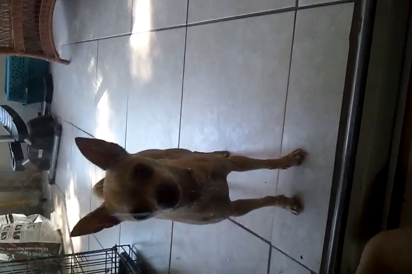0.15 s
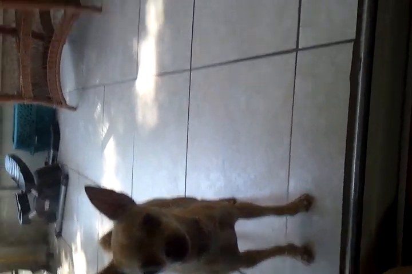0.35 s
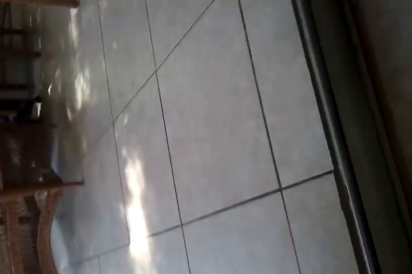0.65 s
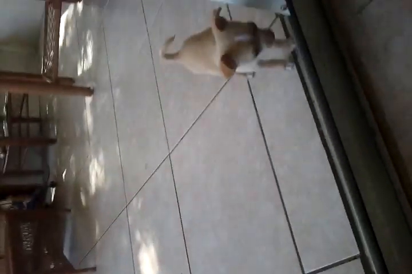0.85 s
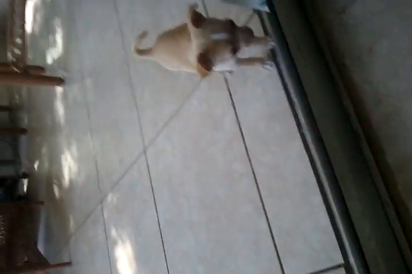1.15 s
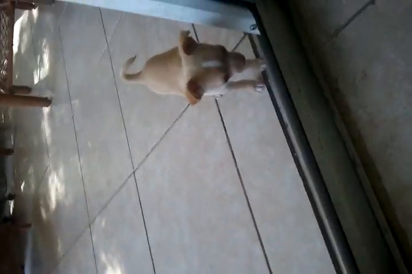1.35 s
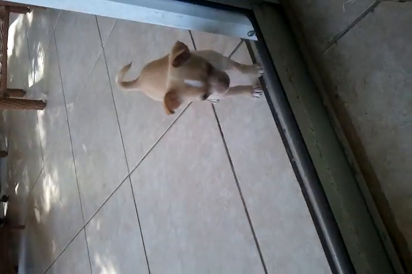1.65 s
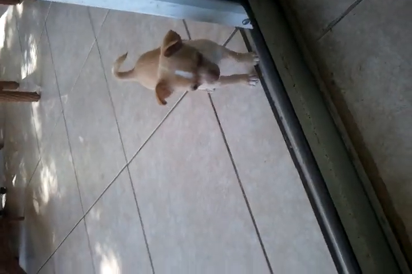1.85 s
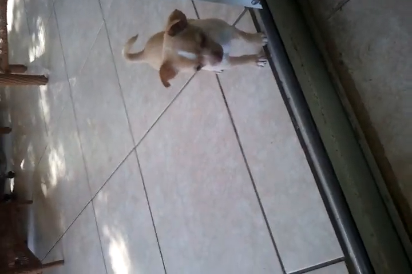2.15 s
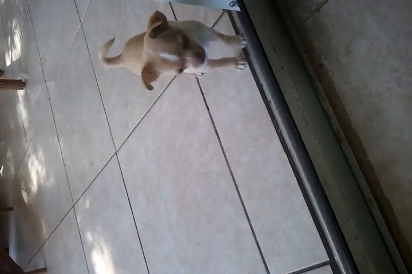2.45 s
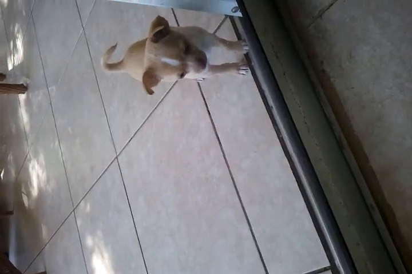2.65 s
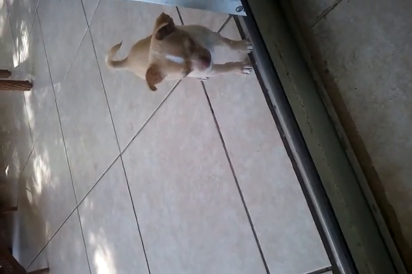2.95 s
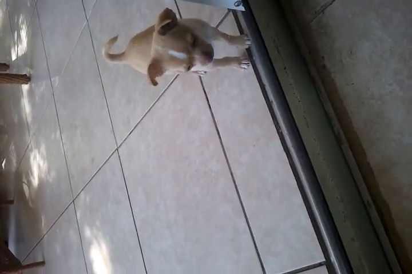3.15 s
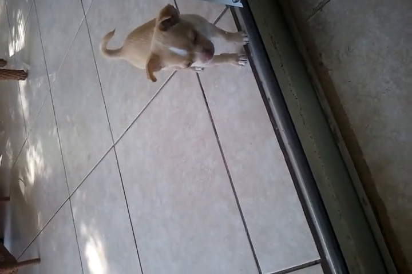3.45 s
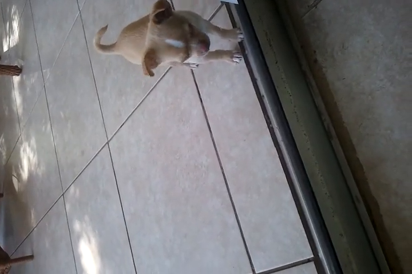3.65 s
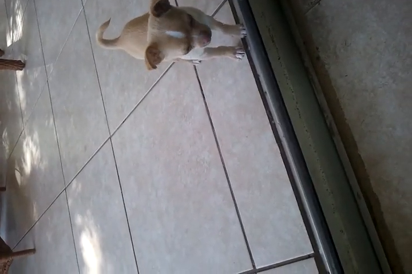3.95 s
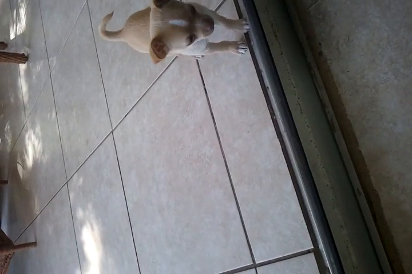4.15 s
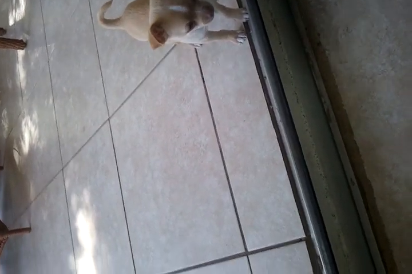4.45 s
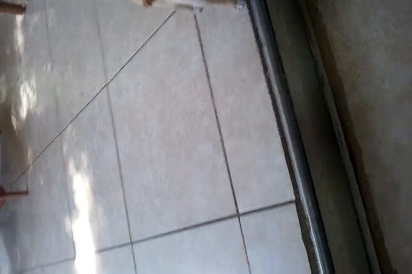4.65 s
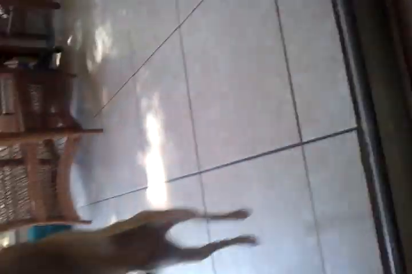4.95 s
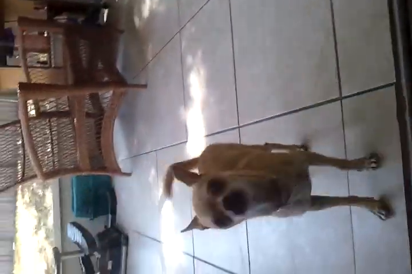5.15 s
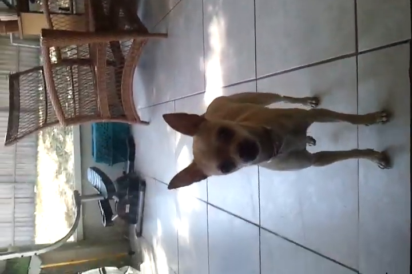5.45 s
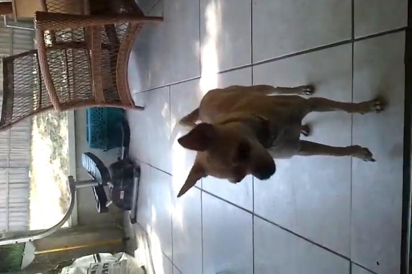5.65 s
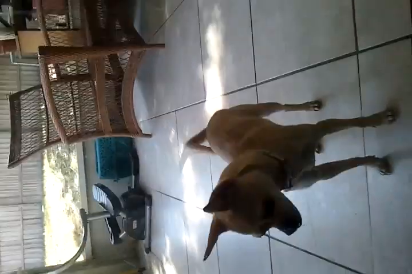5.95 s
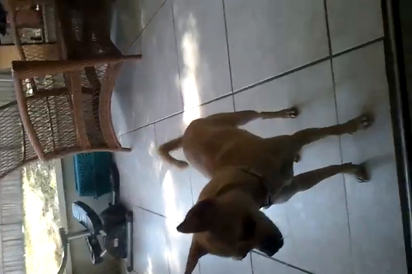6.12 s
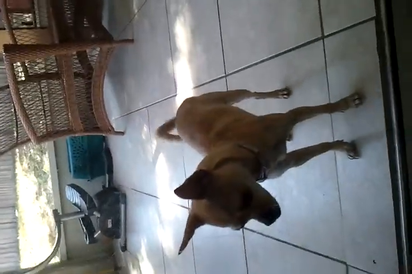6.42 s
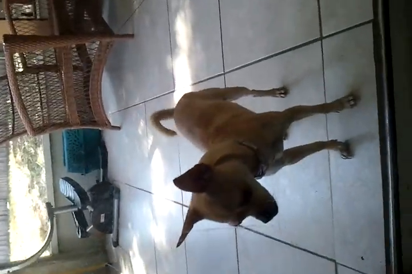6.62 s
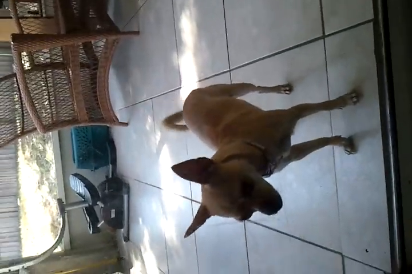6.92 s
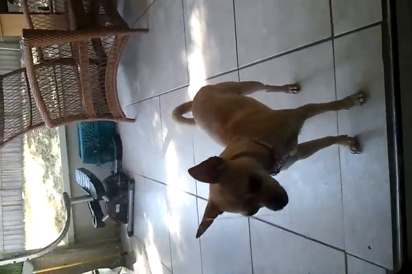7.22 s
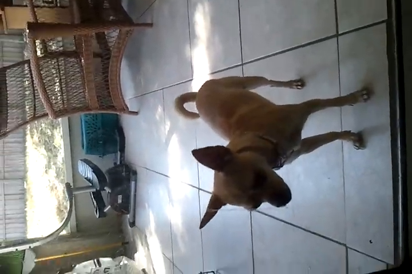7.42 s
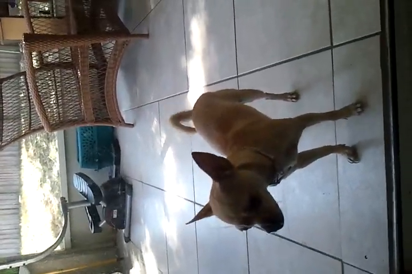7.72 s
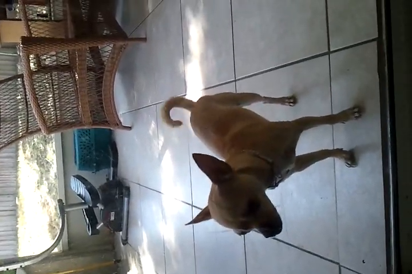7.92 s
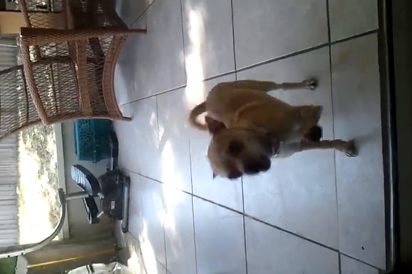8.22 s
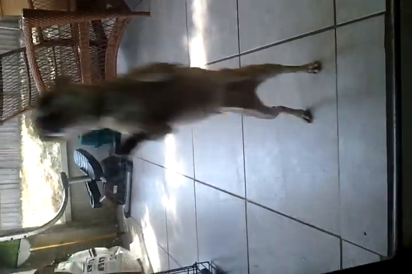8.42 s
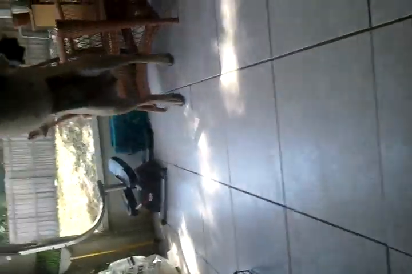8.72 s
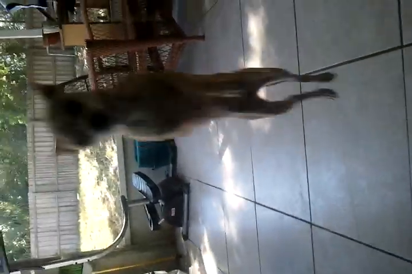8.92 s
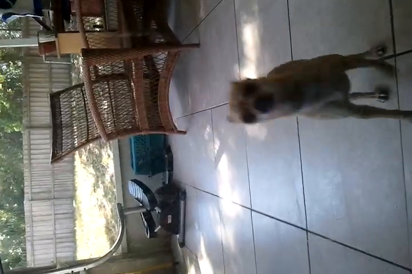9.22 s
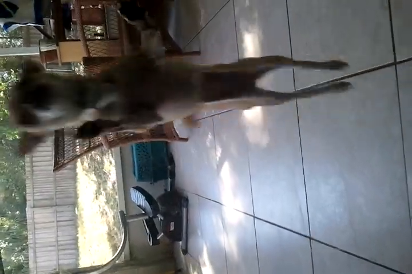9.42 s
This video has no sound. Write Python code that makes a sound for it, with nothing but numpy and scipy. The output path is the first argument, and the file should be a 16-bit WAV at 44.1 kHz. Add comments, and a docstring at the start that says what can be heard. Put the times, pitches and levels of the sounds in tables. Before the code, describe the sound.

In a hard, echoing tiled house, dishes and cutlery clink in the background over a low motor hum, then a door bangs and rebounds and the hum drops away. A small dog whines thinly, then scrabbles its claws on a glass door with deep thuds. Loud dry clicks and creaks come from the handheld microphone's case, before a dull distant knock and more claw taps.

```python
"""Small dog at a glass door

A small dog behind the door whines thinly (gliding tones with an octave partial), then jumps up and
taps the pane: claws scrape and ring the glass, paws swing it, and slide softly on the tiles.
Early on, dishes clink and a door bangs further back in the tiled house (noise bursts with ringing modes)
while a motor hums; dull knocks follow. Air and a low rumble lie beneath.
The hand-held recorder's case clicks and creaks close to the microphone."""
import sys
import numpy as np
from scipy import signal
from scipy.fft import rfft, irfft
from scipy.io import wavfile

SR = 44100
rng = np.random.default_rng(int(sys.argv[2]) if len(sys.argv) > 2 else 0)


def store_pcm(level_fs):
    """Save levels as 16-bit WAV."""
    pcm = np.round(np.clip(level_fs, -1, 1) * 32767).astype(np.int16)
    wavfile.write(sys.argv[1], SR, np.atleast_2d(pcm).T)


N = 422478
TIME = np.arange(N) / SR

# The drawn-out whine, as breakpoints: [start_s, pitch_hz, level_db]
LONG_WHINE = [(3.05, 1112, -48), (3.092, 1012, -43), (3.116, 937.8, -49), (3.128, 942, -51),
              (3.15, 873, -49.5), (3.204, 923, -39.5), (3.38, 938, -39.5), (3.402, 1040, -40),
              (3.418, 1015, -49)]
# Short whines; the octave and echo levels are relative to the fundamental and the call:
# [start_s, length_s, pitch_hz, glide_octaves, level_db, octave_db, echo_db]
SHORT_WHINES = [(4.317, .055, 2180, -0.057, -56.5, 9, -12), (4.39, 0.028, 2150, 0, -65, 15, -12),
                (4.457, 0.039, 2120, -.04, -40, -1.5, -11), (5.235, .036, 741, 0.014, -29, -23, -19),
                (6.738, .11, 746, .5, -43, -18, -15), (9.169, 0.0615, 1118, 0.0091, -34.5, -17, -5)]
WHINE_ATTACK_S, WHINE_RELEASE_S, WHINE_FLUTTER_DB = 0.018, 0.0063, 1.5
SWOOP_HZ, SWOOP_S = 110, 0.0074  # a short whine starts sharp and settles
LONG_WHINE_OCTAVE_DB, LONG_WHINE_ECHO_DB = -8.5, -11.5

# Claws on the pane: [start_s, level_db, ring_hz, tilt_db_per_octave]
CLAW_TAPS = [(4.631, -25, 3060, 2), (4.7027, -18.5, 2550, 3.5), (4.8972, -19.5, 3080, 2),
             (4.946, -23.5, 2960, 2.5), (4.954, -22, 2700, 0), (4.997, -30.5, 2860, 2.5),
             (5.241, -35.5, 2510, 0.5), (8.326, -30.5, 3330, -1.5), (8.336, -31.5, 2400, -3.5),
             (8.58, -25.5, 4420, 4), (8.587, -25, 2370, 4), (8.6454, -22, 2900, 3), (8.84, -26, 3070, 4),
             (8.959, -41, 2900, 9), (9.099, -40, 2820, 2), (9.187, -39.5, 2510, 5),
             (9.5287, -20.5, 3890, 3.5)]
# Spectrum of the claws' scrape: [frequency_hz, level_db]
CLAW_COLOUR = [(150, -35.5), (500, -20), (900, -10), (1450, -2.5), (1800, -4), (2350, -1), (3100, -1),
               (4000, -2.5), (4600, -7), (5900, -7.5), (7000, -19.5)]
# Rings of a claw on glass: [frequency_hz, level_db, t60_s]
GLASS_MODES = [(2320, -1, .1), (3040, -4.5, .1), (3780, -9.5, .1), (4420, 5.5, .1), (4990, -1, .1),
               (5830, -13, .08), (6300, -7, .08)]
CLAW_ATTACK_S, SKID_S = 0.0022, 0.012
CLAW_RING_DB, GLASS_RING_DB = -5, -14  # relative to the scrape

# Paws pushing the whole pane: [start_s, push_db]
PANE_PUSHES = [(4.632, -13), (4.704, -16), (8.586, -23.5), (8.651, -21), (9.529, -19)]
# Spectrum of the pads' thud: [frequency_hz, level_db]
THUD_COLOUR = [(60, 2), (140, -7), (300, -12.5), (600, -20.5), (2000, -45)]
THUD_DB = 3.5  # at a push of 0 dB

# Paws sliding on the tiles: [centre_s, level_db, half_length_s]
PAW_SLIDES = [(5.14, -41, .02), (5.44, -47.5, 0.022), (5.577, -46, 0.048), (5.672, -43.5, 0.055),
              (5.83, -47, 0.012)]
# Spectrum of a slide: [frequency_hz, level_db]
SLIDE_COLOUR = [(500, -19), (2000, -1), (3300, -0.5), (5000, -1.5), (7000, -7)]

# Dishes and cutlery set down or jolted: [start_s, level_db, tilt_db_per_octave, plate_ring_db]
DISH_CLINKS = [(0.0, -37, -2.5, -4.5), (0.088, -34.5, 0, -13), (0.174, -30.5, 2, -19),
               (0.284, -33.5, 1, -17), (0.353, -27, 2, -1.5), (0.468, -31.5, 1, -2),
               (0.653, -33, -1.5, -18), (0.837, -33.5, 0, -18.5), (1.028, -29.5, -0.5, -12),
               (1.104, -29, 2.35, -5.5), (1.202, -30, -1, -10), (1.402, -34.5, -0.5, -10.5)]
# Spectrum of the clatter: [frequency_hz, level_db]
DISH_COLOUR = [(240, -46.5), (400, -15), (462, -27.5), (737, -4), (830, -10), (1060, -6.5), (1360, -6),
               (1990, -3), (2240, -7.5), (3760, -11.5), (4390, -12.5), (4950, -7), (7000, -22.5),
               (9100, -44), (15400, -120)]
# Modes of a plate: [frequency_hz, level_db, t60_s]
PLATE_MODES = [(985, -1.5, 0.58), (1085, -3, 1), (1173, -7, 0.53), (1690, -10, 0.68), (1855, -5, 0.81),
               (2030, -2.5, 0.69), (2434, -11, .6)]
# Modes of the cutlery: [frequency_hz, level_db, t60_s]
CUTLERY_MODES = [(4700, -8, 1), (4937, 2, 0.57), (5070, -2, 0.41), (5050, -12, .55), (6610, -11, .5),
                 (6646, -11, 0.29)]
# Modes of the bowl: [frequency_hz, level_db, t60_s]
BOWL_MODES = [(3050, 0.5, 0.85), (3330, -0.5, 1), (3440, -3.5, 0.65), (5160, -6, 0.95), (5330, -5, 0.47),
              (6670, -12, 0.53), (6780, -16.5, 0.91)]
CLINK_RISE_S = 0.00064
CUTLERY_DB, CUTLERY_DB_PER_TILT = -15, 5.5  # the harder and brighter a contact, the more the cutlery rings
BOWL_S, BOWL_DB = 1.576, -36
JINGLE_S, JINGLE_DB = 2.13, -41.5  # the door's rebound jolts the cutlery

# A door shutting and rebounding: [start_s, level_db]
DOOR_BANGS = [(1.928, -19), (1.9476, -23.5), (2.121, -27.5)]
# Spectrum of the bang: [frequency_hz, level_db]
DOOR_COLOUR = [(60, -21), (110, -9.5), (150, -1), (210, -18), (300, -10), (450, -10.5), (700, -12),
               (1250, -8), (2000, -13), (3100, -13), (4500, -22), (6000, -22.5), (7000, -36.5)]
# Modes of the door leaf: [frequency_hz, level_db, t60_s]
DOOR_MODES = [(147, 1.5, .77), (285.3, 5.5, 0.6), (413, 6, 0.46), (590, -5, 1.2), (755, -4, 0.9),
              (965, 4.5, 0.77), (1226, -2, 1.06), (1514, -4, 1.3), (1610, -7, 1.4), (1822, -9, 1.5),
              (2306, -9.5, 1.4), (2640, 1, 0.6), (3182, -3.5, 1.1), (4084, -3.5, 0.64), (4931, -15, 1)]
# The leaf's lowest mode, set going as it shuts
BOOM_HZ, BOOM_DB, BOOM_RISE_S, BOOM_T60_S = 147.5, -12, 0.024, 0.51

# Dull knocks further back: [start_s, level_db, rise_s]
DISTANT_KNOCKS = [(5.69, -37, 0.027), (8.015, -26.5, 0.0046), (8.045, -32, 0.0088), (9.178, -42.5, .003)]
# Spectrum of a knock: [frequency_hz, level_db]
KNOCK_COLOUR = [(70, -23.5), (145, -1), (190, -24.5), (400, -19.5), (850, -21.5), (1300, -12.5),
                (1650, -19.5), (2350, -20.5), (2900, -27), (4300, -28.5), (4650, -27.5), (5300, -33.5),
                (6000, -31.5), (7000, -45)]
# Modes of whatever is knocked: [frequency_hz, level_db, t60_s]
KNOCK_MODES = [(1180, 2, 1), (1320, 2.5, 0.75), (1900, -2, .8), (2380, -2.5, 1), (4600, -6, .6),
               (5000, -11.5, 0.65), (5200, -3.5, .7)]

# Clicks and creaks of the case: [start_s, snap_peak_db, tilt_db_per_octave, creak_length_s]
CASE_CLICKS = [(5.102, -24.5, -2, 0), (5.6247, -5.5, 2, 0), (5.948, -24.5, -9.5, .01),
               (5.982, -25.5, -4, .006), (5.996, -24, -8.5, .003), (6.883, -9, -0.5, .006),
               (6.89, -9.5, 1.5, .003), (6.8994, -10, -1, .003), (7.086, -2, 1.5, .016),
               (7.110, -17, -2, .003)]
# Spectrum of the case: [frequency_hz, level_db]
CASE_COLOUR = [(120, -80.5), (200, -36), (584, -5.5), (752, -12.5), (1040, -1), (1190, -8.5), (1580, -4),
               (1750, -7), (2580, -7), (2910, -13.5), (3530, -11), (5860, -11.5), (7000, -25), (9100, -33),
               (15400, -120)]
SLIP_GAP_S = 0.004
SLIP_DB, SLIP_SCATTER_DB = -4.5, 1.5  # relative to the creak's first snap
RATTLE_DB, RATTLE_T60_S = -13, 0.031

# Level of the motor, as breakpoints: [time_s, level_db]
MOTOR_LEVEL = [(0, -37), (1.2, -34.5), (2.45, -31), (2.65, -48), (9.58, -55)]
# Spectrum of the room air: [frequency_hz, level_db]
AIR_COLOUR = [(65, -32), (110, 0.5), (118, -3), (145, -3.5), (334, -7), (594, -11), (636, -11.5),
              (949, -15), (1150, -15.5), (1370, -18), (5580, -29), (7000, -39), (9100, -73.5),
              (15400, -120)]
# Spectrum of the low rumble: [frequency_hz, level_db]
RUMBLE_COLOUR = [(10, -9), (25, -3), (42, -4), (55, -4.5), (72, -6.5), (95, -3.5), (125, -22), (200, -36),
                 (1000, -89.5)]
# Level of the rumble, as breakpoints: [time_s, level_db]
RUMBLE_LEVEL = [(0, -40), (4.4, -34), (5.0, -30), (6.2, -35.5), (8.2, -34), (9.58, -33)]
AIR_DB = -39.5

# The recorder, in units of full scale: clipping limits, then the constant offset of its output
RAIL_LOW, RAIL_HIGH, BIAS = -0.42, 1.1, -0.4044
TOP_HZ = 7080


def undb(db):
    """Amplitude ratio: 20 dB is a factor of ten."""
    return 10 ** (np.asarray(db) / 20)


def unit(x):
    """Normalise to an rms of 1."""
    return x / np.sqrt(np.mean(x ** 2))


def seconds(length):
    """Sampled time axis of a short sound."""
    return np.arange(int(length * SR)) / SR


def add(out, start_s, x):
    """Superposition: mix x into out from start_s on."""
    i = max(int(start_s * SR), 0)
    out[i:i + len(x)] += x[:max(len(out) - i, 0)]


def gains(colour, size, tilt_db=0):
    """Spectral envelope, interpolated over log frequency and tilted about 2500 Hz for up to two octaves."""
    octave = np.log2(np.fft.rfftfreq(size, 1 / SR) + 1)
    hz, db = np.transpose(colour)
    tilt = tilt_db * np.clip(octave - np.log2(2500), -2, 2)
    return undb(np.interp(octave, np.log2(hz), db) + tilt)


def noise(colour, size, tilt_db=0):
    """Coloured noise: white noise filtered by a spectral envelope, rms 1."""
    white = rfft(rng.standard_normal(size))
    return unit(irfft(white * gains(colour, size, tilt_db), size))


def band(hz, width_hz, size):
    """Resonance: noise under a Lorentzian gain of full width width_hz at half amplitude, rms 1."""
    f = np.fft.rfftfreq(size, 1 / SR)
    white = rfft(rng.standard_normal(size))
    return unit(irfft(white / (1 + (2 * (f - hz) / width_hz) ** 2), size))


def fade(t, t60):
    """Exponential decay: a fall of 60 dB in t60 seconds."""
    return np.exp(-np.log(1000) * t / t60)


def ring(modes, t, width_hz):
    """Modal decay: each mode fades at its own rate, blurred by a room into a narrow band."""
    return sum(undb(db) * band(hz, width_hz, len(t)) * fade(t, t60) for hz, db, t60 in modes)


def room(x, wet_db, t60):
    """Reverberation: convolve with decaying noise, the diffuse tail of the tiled room."""
    t = seconds(0.8)
    build = 1 - np.exp(-t / 0.015)
    tail = noise([(200, 8.0), (2500, -1), (7000, 0)], len(t)) * fade(t, t60) * build
    echo = signal.fftconvolve(x, tail / np.linalg.norm(tail))[:N]
    return x + undb(wet_db) * echo


def whistle(hz, db, octave_db):
    """Frequency modulation: a slightly unsteady tone and its octave, eased in and out."""
    t = np.arange(len(hz)) / SR
    unsteady_hz = hz * (1 + 0.01 * band(0, 150, len(t)))
    phase = 2 * np.pi * np.cumsum(unsteady_hz) / SR
    tone = np.sin(phase) + undb(octave_db) * np.sin(2 * phase)
    gate = np.clip(np.minimum(t / WHINE_ATTACK_S, (t[-1] - t) / WHINE_RELEASE_S), 0, 1)
    level = undb(db + WHINE_FLUTTER_DB * band(0, 90, len(t)))
    return np.sqrt(2) * tone * gate * level  # root 2 gives the fundamental an rms of 1


def whines():
    """Voiced tones and their reverberation: one drawn out, the others short, starting sharp of their pitch."""
    direct, send = np.zeros(N), np.zeros(N)
    s, hz, db = np.transpose(LONG_WHINE)
    t = s[0] + seconds(s[-1] - s[0])
    call = whistle(np.interp(t, s, hz), np.interp(t, s, db), LONG_WHINE_OCTAVE_DB)
    add(direct, s[0], call)
    add(send, s[0], undb(LONG_WHINE_ECHO_DB) * call)
    for start_s, length, hz, glide, db, octave_db, echo_db in SHORT_WHINES:
        t = seconds(length)
        pitch = hz * 2 ** (glide * t / length) + SWOOP_HZ * np.exp(-t / SWOOP_S)
        call = whistle(pitch, db, octave_db)
        add(direct, start_s, call)
        add(send, start_s, undb(echo_db) * call)
    echo = room(send, wet_db=0, t60=0.6) - send
    return direct + echo


def claws():
    """Friction and modal ringing: each claw skids for a few ms, scraping grittily and ringing pane and claw."""
    out, t = np.zeros(N), seconds(0.1)
    shape = (1 - np.exp(-t / CLAW_ATTACK_S)) * np.exp(-(t / SKID_S) ** 1.53)
    for start_s, db, hz, tilt_db in CLAW_TAPS:
        scrape = noise(CLAW_COLOUR, len(t), tilt_db)
        claw_ring = undb(CLAW_RING_DB) * band(hz, 260, len(t))
        glass_ring = undb(GLASS_RING_DB) * ring(GLASS_MODES, t, width_hz=130)
        grit = undb(1.66 * band(0, 700, len(t)))  # fast random level changes
        tap = undb(db) * (scrape + claw_ring + glass_ring) * grit * shape
        add(out, start_s, tap)
        # the tiled floor sends it back about a millisecond later, colouring every tap differently
        add(out, start_s + rng.uniform(0.0008, 0.0014), 0.45 * tap)
    return room(out, wet_db=-9.5, t60=0.91)


def pane():
    """Plate vibration: a push swings the pane in proportion; the pads' dull thud grows with its square."""
    out, t = np.zeros(N), seconds(0.9)
    swing = np.sin(2 * np.pi * 43 * t) * fade(t, 0.5)
    swing += undb(-12) * np.sin(2 * np.pi * 29 * t) * fade(t, 0.7)
    for start_s, db in PANE_PUSHES:
        push = undb(db)
        thud = undb(THUD_DB) * noise(THUD_COLOUR, len(t)) * fade(t, 0.34)
        add(out, start_s, push * swing + push ** 2 * thud)
    return out


def slides():
    """Sliding friction: noise swells and falls with pressure as paws shift softly on the tiles."""
    pressure = sum(undb(db) * np.exp(-((TIME - s) / half) ** 2) for s, db, half in PAW_SLIDES)
    roughness = undb(2.5 * band(0, 200, N))
    return pressure * noise(SLIDE_COLOUR, N) * roughness


def dishes():
    """Impact excitation: short contacts with their echo set plates and cutlery ringing; a bowl is struck too."""
    out, t = np.zeros(N), seconds(0.92)
    contact = fade(t, 0.98) + 0.36 * fade(t, 0.071)  # echo and short contact
    build = 1 - np.exp(-t / CLINK_RISE_S)
    for start_s, db, tilt_db, plate_db in DISH_CLINKS:
        clatter = noise(DISH_COLOUR, len(t), tilt_db) * contact
        plate = undb(plate_db) * ring(PLATE_MODES, t, width_hz=88)
        cutlery_db = CUTLERY_DB + CUTLERY_DB_PER_TILT * tilt_db
        cutlery = undb(cutlery_db) * ring(CUTLERY_MODES, t, width_hz=100)
        add(out, start_s, undb(db) * (clatter + plate + cutlery) * build)
    bowl = ring(BOWL_MODES, t, width_hz=140)
    bowl += undb(3.0) * noise(DISH_COLOUR, len(t), tilt_db=-0.5) * fade(t, 1.0)
    add(out, BOWL_S, undb(BOWL_DB) * bowl)
    jingle = ring(CUTLERY_MODES, t, width_hz=90) * build
    add(out, JINGLE_S, undb(JINGLE_DB) * jingle)
    return out


def door():
    """Impact and panel modes: the shutting leaf booms and rings on, with a long echo from the hard walls."""
    out, t = np.zeros(N), seconds(0.98)
    build = 1 - np.exp(-t / 0.007)
    for start_s, db in DOOR_BANGS:
        crash = noise(DOOR_COLOUR, len(t)) * (fade(t, 1.0) + 1.9 * fade(t, 0.051))
        panel = undb(-12.5) * ring(DOOR_MODES, t, width_hz=22)
        add(out, start_s, undb(db) * (crash + panel) * build)
    boom = np.sin(2 * np.pi * BOOM_HZ * t) * fade(t, BOOM_T60_S) * (1 - np.exp(-t / BOOM_RISE_S))
    add(out, DOOR_BANGS[0][0], undb(BOOM_DB) * boom)
    return out


def knocks():
    """Diffuse field: distant knocks on something that rings, nearly all echo."""
    out, t = np.zeros(N), seconds(0.77)
    for start_s, db, rise_s in DISTANT_KNOCKS:
        knock = noise(KNOCK_COLOUR, len(t)) * fade(t, 0.94)
        knock += undb(-14) * ring(KNOCK_MODES, t, width_hz=70)
        add(out, start_s, undb(db) * knock * (1 - np.exp(-t / rise_s)))
    return out


def snap(tilt_db, size):
    """Minimum phase: a one-sided cepstrum makes one abrupt, causal click of the case, peak 1."""
    cepstrum = irfft(np.log(gains(CASE_COLOUR, size, tilt_db)))
    x = irfft(np.exp(rfft(2 * cepstrum[:size // 2], size)))
    return x / np.abs(x).max()


def case():
    """Stick-slip: plastic gives under the grip with a dry snap; a creak adds weaker slips and short rattles."""
    out, t = np.zeros(N), np.arange(2048) / SR
    for start_s, db, tilt_db, length in CASE_CLICKS:
        click = snap(tilt_db, size=len(t))
        add(out, start_s, undb(db) * click)
        for lag in np.arange(0, length, SLIP_GAP_S):
            rattle = undb(RATTLE_DB) * noise(CASE_COLOUR, len(t), tilt_db) * fade(t, RATTLE_T60_S)
            slip = undb(SLIP_DB + SLIP_SCATTER_DB * rng.standard_normal()) * click
            add(out, start_s + lag, undb(db) * rattle)
            add(out, start_s + lag + SLIP_GAP_S * rng.uniform(0.5, 1), undb(db) * slip)
    return room(out, wet_db=-20, t60=0.78)


def background():
    """Stationary noise and a periodic source: room air, a low rumble, and a motor's hum that dies away."""
    air = undb(AIR_DB) * noise(AIR_COLOUR, N)
    rumble = undb(np.interp(TIME, *np.transpose(RUMBLE_LEVEL))) * noise(RUMBLE_COLOUR, N)
    motor = np.sin(2 * np.pi * 75.2 * TIME) + 0.24 * band(71, 20, N)
    hum = motor * undb(np.interp(TIME, *np.transpose(MOTOR_LEVEL)))
    return air + rumble + hum


def scene():
    """Superposition of all sources, as one channel."""
    dog = whines() + claws() + pane() + slides()
    house = dishes() + door() + knocks()
    return (dog + house + case() + background())[None]


def record(dry):
    """Clipping and band limiting: the negative side clips early, the top is cut, a constant bias is added."""
    clipped = np.clip(dry, RAIL_LOW, RAIL_HIGH)
    low_pass = signal.ellip(12, 0.2, 80, TOP_HZ, fs=SR, output="sos")
    return BIAS + signal.sosfilt(low_pass, clipped)


dry = scene()
out = record(dry)
store_pcm(out)
```